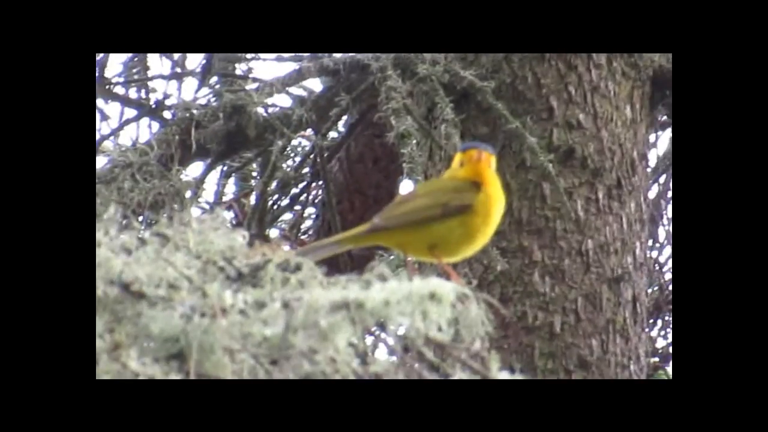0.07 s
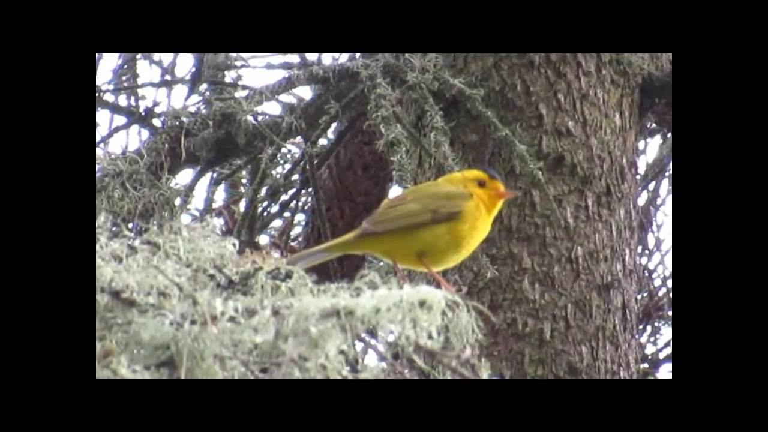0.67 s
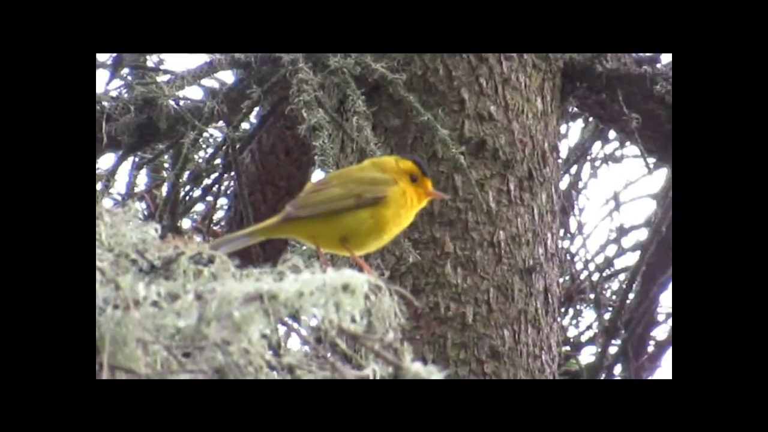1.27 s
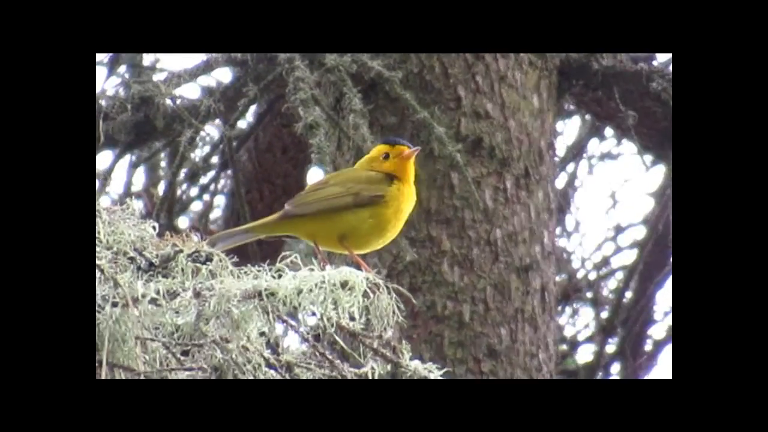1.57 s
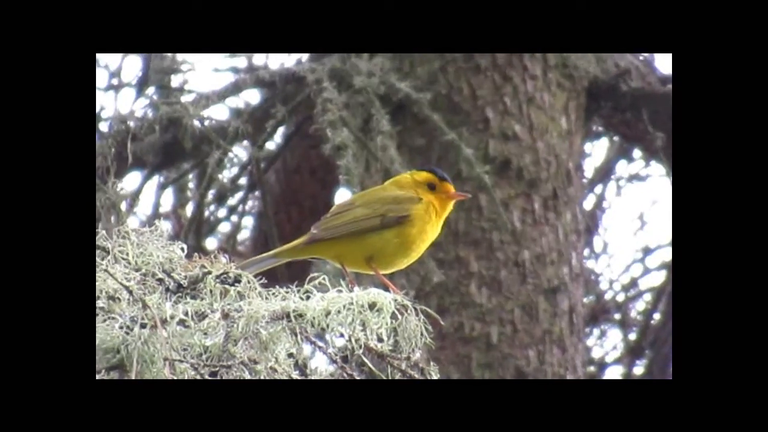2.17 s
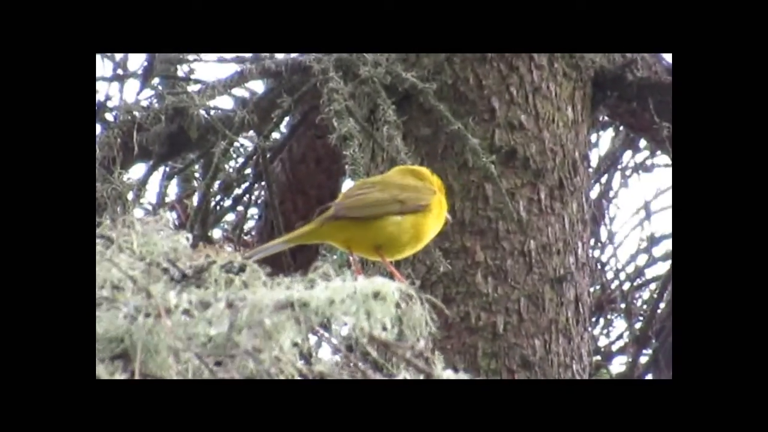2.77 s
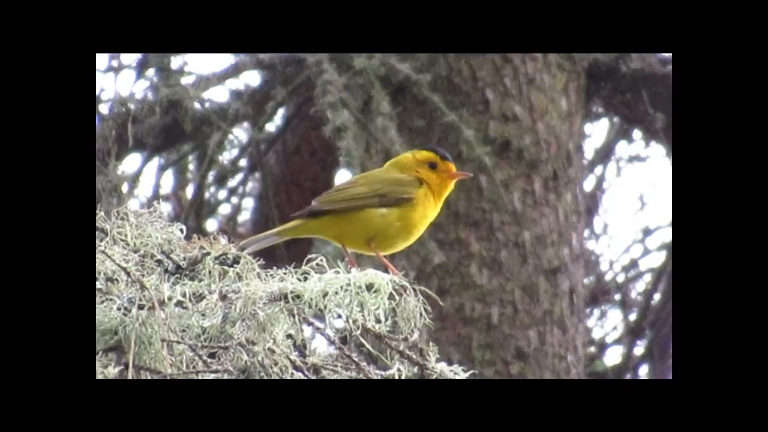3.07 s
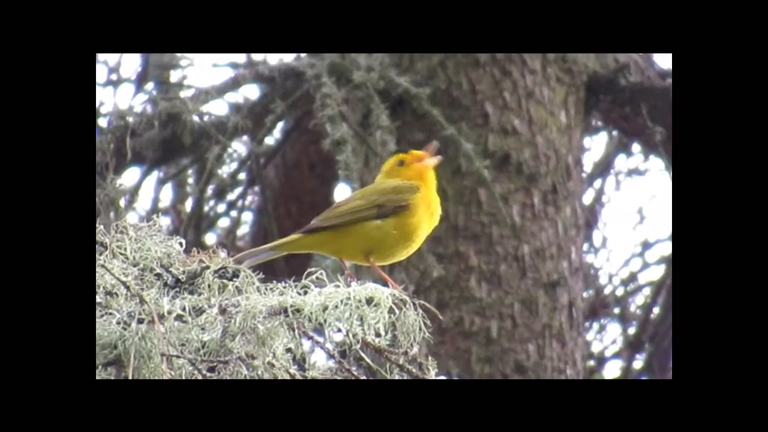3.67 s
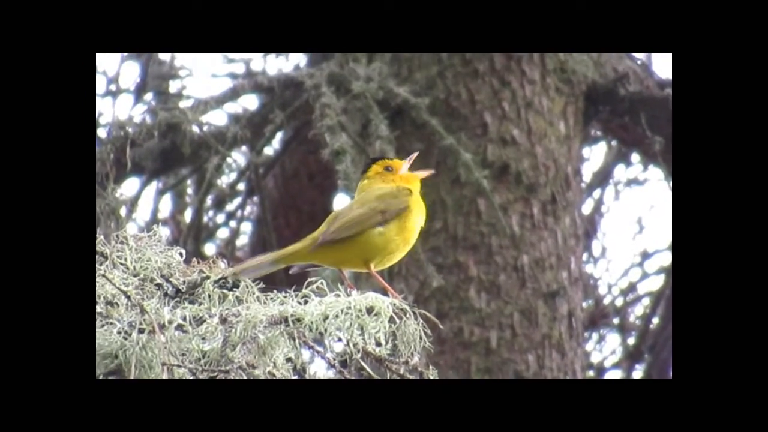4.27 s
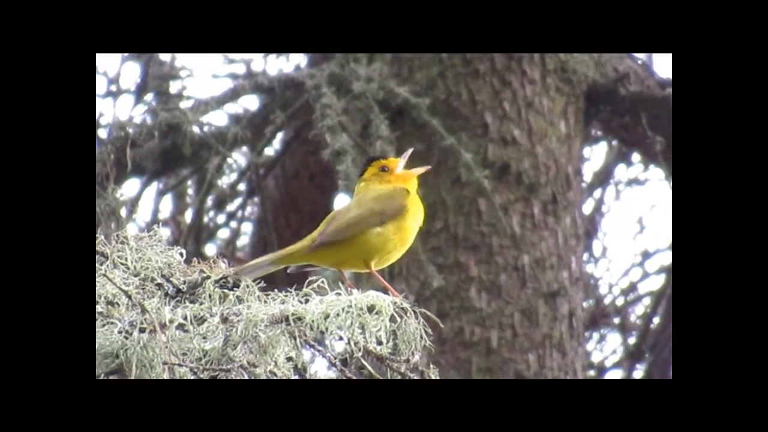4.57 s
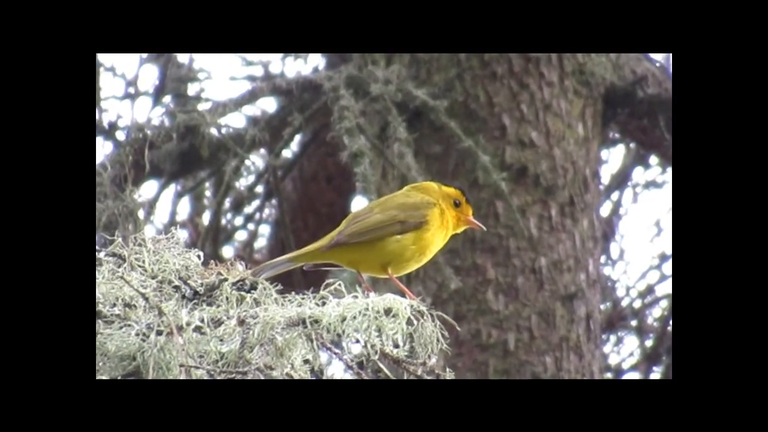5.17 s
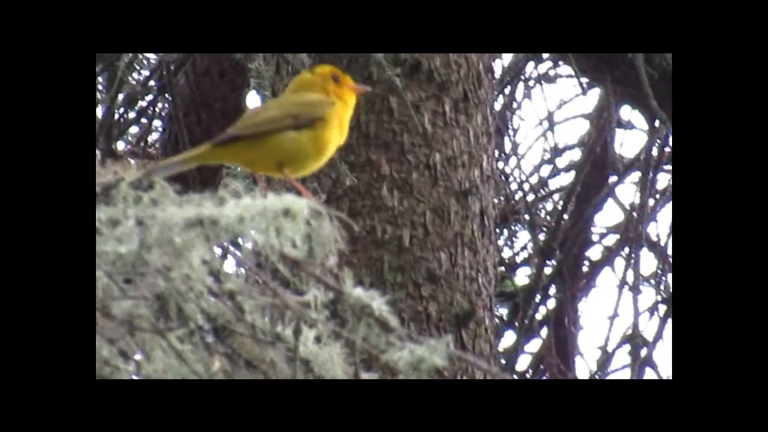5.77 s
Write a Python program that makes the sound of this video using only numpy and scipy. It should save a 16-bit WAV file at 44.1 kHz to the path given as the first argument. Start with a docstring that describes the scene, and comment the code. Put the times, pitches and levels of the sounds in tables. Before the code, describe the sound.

A faint, steady rush of distant traffic runs throughout, with a light hiss and a low engine hum that slowly rises in pitch and drops back at about 4.4 seconds. A few very quiet bird pings and peeps come in the first two and a half seconds. From about 3 seconds, thin, high, falling calls echo from deep in the wood. At 3.7 seconds a small warbler nearby starts a quick, even run of nine sharp, high two-part chips. They begin softly, swell to become by far the loudest sound, and end at about 5 seconds, leaving a short echo among the trees. A tiny tick is almost hidden in the song at 4.6 seconds. More distant calls follow, and a small dry tick sounds close by just before everything cuts off at 5.5 seconds.

```python
"""A steady rush of traffic is heard first, with a distant engine that slowly speeds up and drops back.
Birds call from deep in the wood, mostly as echo. Then a small yellow warbler on a conifer branch
sings a swelling run of sharp two-part chips, each a frequency-modulated whistle that trunks and
twigs scatter. Two small ticks sound close by, then the sound cuts to silence."""
import sys
import numpy as np
from scipy import signal
from scipy.fft import rfft, irfft, next_fast_len
from scipy.io import wavfile
from scipy.ndimage import uniform_filter1d, map_coordinates

SR = 44100
rng = np.random.default_rng(int(sys.argv[2]) if len(sys.argv) > 2 else 0)


def inscribe(sig):
    """Save sig as 16-bit PCM at rate SR to the path in sys.argv[1].

    A 1-D sig is mono; a 2-D sig holds one channel per row.
    Samples are clipped to [-1, 1] before scaling.
    """
    pcm = np.round(np.clip(np.atleast_2d(sig).T, -1, 1) * 32767)
    wavfile.write(sys.argv[1], SR, pcm.astype(np.int16))


N = 260631
T = np.arange(N) / SR


def amp(db):
    """Amplitude ratio of a level in decibels."""
    return 10 ** (np.asarray(db) / 20)


def wobble(rate):
    """Smooth random modulation: a spline through `rate` Gaussian values a second."""
    return map_coordinates(rng.standard_normal(int(N * rate / SR) + 4), [T * rate])


def filtered(x, response):
    """Linear filtering: the spectrum of x times a frequency response."""
    size = next_fast_len(N + SR // 2)
    return irfft(rfft(x, size) * response(np.fft.rfftfreq(size, 1 / SR)), size)[:N]


def noise(spectrum):
    """Spectral shaping: white noise coloured by (f/Hz, level/dB) rows and scaled to rms 1."""
    f, db = np.transpose(spectrum)
    x = filtered(rng.standard_normal(N), lambda hz: amp(np.interp(np.log(hz + 1), np.log(f), db)))
    return x / np.sqrt(np.mean(x ** 2) + 1e-20)


def phase_of(hz):
    """Phase as the time integral of frequency."""
    return 2 * np.pi * np.cumsum(hz) / SR


def add(track, start_s, sound):
    """Superposition: a sound joins the track at start_s."""
    part = track[round(start_s * SR):][:len(sound)]
    part += sound[:len(part)]


def scatter(x, t60, build_s):
    """Multiple scattering: echoes from many branches build up, then decay exponentially."""
    t = np.arange(SR) / SR
    tail = rng.standard_normal(SR) * amp(-60 * t / t60) * (1 - np.exp(-t / build_s))
    return signal.fftconvolve(x, tail / np.linalg.norm(tail))


# Spectrum of the hiss: f/Hz, relative level/dB
HISS_SPECTRUM = [(1000, 5.5), (4000, -3.5), (7000, 0.5), (10000, -1), (12500, -5), (15000, -12)]

def hiss():
    """Stationary broadband noise, faint and even."""
    return amp(-66) * noise(HISS_SPECTRUM)


# Spectra of road rumble and tyre rush: f/Hz, relative level/dB
RUMBLE_SPECTRUM = [(12, -11.5), (30, -4), (55, 2), (90, 1), (180, 4.5), (280, -1.5), (450, -5.5),
                   (800, -16), (2000, -49.5)]
TYRE_SPECTRUM = [(150, -30.5), (400, -5.5), (600, 0), (780, 1.5), (1000, -1.5), (1300, -3), (2000, -8.5),
                 (2800, -14.5), (4000, -22), (6000, -25), (12000, -40.5)]
# Tyre rush as the traffic draws slowly nearer: t/s, level/dB
TYRE_APPROACH = [(0, -46.5), (.6, -48), (2, -46.5), (4.3, -45.5), (4.8, -43.5), (5.45, -43)]

def traffic():
    """Rolling noise: broadband rumble and rush; the tread sings in a narrow band as the rush grows."""
    tyre_db = np.interp(T, *np.transpose(TYRE_APPROACH))
    rumble = amp(-45 + .7 * wobble(8)) * noise(RUMBLE_SPECTRUM)
    tyres = amp(tyre_db + .17 * wobble(6)) * noise(TYRE_SPECTRUM)
    tread_db = -47 + 5.1 * (tyre_db - np.max(tyre_db))
    tread = noise([(400, -42.5), (640, -8.5), (750, -2.5), (880, -11.5),
                   (1300, -41), (3100, -19), (4000, -49)])
    return rumble + tyres + amp(tread_db) * tread


# Firing rate through a slow climb and a gear change: t/s, f/Hz
FIRING_RATE = [(0, 45.6), (.4, 46.3), (.8, 49.5), (1.9, 52.5), (3.02, 54.9), (4.01, 58.4), (4.36, 58.5),
               (4.52, 51.5), (4.84, 50.6), (5.45, 51)]
# Engine harmonics: multiple of the firing rate, relative level/dB
ENGINE_ORDERS = [(1, 3), (2, 1), (3, -0.5), (4, 0.5), (5, -8.5), (6, -8)]
# Response of exhaust and path, a boom with a notch above it: f/Hz, level/dB
EXHAUST_RESPONSE = [(50, -62), (92, -63), (101, -56), (110, -53.5), (117, -49), (138, -44.3), (151, -45.7),
                    (171, -49.5), (177, -63), (200, -57), (230, -51.5), (280, -49.5), (350, -56)]

def engine(waver_db=1.3):
    """Source and filter: firing harmonics swell and fade as they cross the exhaust's resonance."""
    firing_hz = np.interp(T, *np.transpose(FIRING_RATE))
    phase = phase_of(firing_hz * (1 + .0031 * wobble(12)))
    f, response_db = np.transpose(EXHAUST_RESPONSE)
    out = np.zeros(N)
    for order, db in ENGINE_ORDERS:
        exhaust_db = np.interp(np.log(order * firing_hz), np.log(f), response_db)
        rms = amp(db + exhaust_db + waver_db * wobble(6.3))
        out += rms * np.sin(order * phase + .16 * wobble(14) + rng.uniform(0, 2 * np.pi))
    return np.sqrt(2) * out


def whistle(hz, waver=.014):
    """Frequency modulation: a soft-edged tone wavers at random about a pitch curve."""
    return signal.windows.tukey(len(hz), .5) * np.sin(phase_of(hz * (1 + waver * wobble(500)[:len(hz)])))


def slur(length_s, start_hz, end_hz):
    """Quadratic frequency sweep: a note glides and settles on its last pitch."""
    progress = np.linspace(0, 1, round(length_s * SR))
    return whistle(end_hz + (start_hz - end_hz) * (1 - progress) ** 2)


# Evenly timed corners of a zigzag chirp: f/Hz
CHIRP_CORNERS = [4400, 3750, 4700, 3860]

def quiet_birds(note_s=.025, chirp_s=.061, peep_hz=5300, peep_every_s=.08):
    """Direct sound outweighs reverberation in these drier calls: a ping, a chirp, then four peeps."""
    calls = np.zeros(N)
    add(calls, .11, amp(-49.2) * slur(note_s, start_hz=3840, end_hz=3730))
    position = np.linspace(0, len(CHIRP_CORNERS) - 1, round(chirp_s * SR))
    chirp_hz = np.interp(position, np.arange(len(CHIRP_CORNERS)), CHIRP_CORNERS)
    add(calls, 1.685, amp(-55.5) * whistle(chirp_hz, waver=.025))
    peep_pitches = peep_hz * (1 + .025 * rng.standard_normal((4, 2)))
    for k, (start_hz, end_hz) in enumerate(peep_pitches):
        add(calls, 2.272 + k * peep_every_s, amp(-63) * slur(note_s, start_hz, end_hz))
    return calls + amp(-2) * scatter(calls, t60=.7, build_s=.006)[:N]


# Slurred calls from deep in the wood: t/s, start f/Hz, end f/Hz, echo level/dB
FAR_CALLS = [ (1.469, 5000, 4560, -59), (2.928, 7300, 6620, -53), (3.07, 5900, 5200, -52.5),
             (3.155, 8150, 7600, -51.5), (3.236, 7660, 6170, -41.5), (3.265, 6230, 5000, -49),
             (3.396, 4900, 4200, -52.5), (3.51, 5900, 4380, -47.5), (3.645, 8380, 7740, -45),
             (3.777, 7400, 5520, -39.5), (3.859, 4300, 3960, -52.5), (4.36, 8300, 7850, -52),
             (5.09, 3010, 3350, -54.5), (5.202, 8100, 7130, -41), (5.344, 8300, 8040, -44),
             (5.374, 8000, 6500, -43)]

def far_birds(note_s=.032, direct_to_echo_db=-9):
    """Beyond the critical distance reverberation dominates: these calls arrive mostly as echo."""
    out = np.zeros(N)
    for start_s, start_hz, end_hz, db in FAR_CALLS:
        note = amp(db) * slur(note_s, start_hz, end_hz)
        add(out, start_s, amp(direct_to_echo_db) * note)
        add(out, start_s, scatter(note, t60=.94, build_s=.0077))
    return out


# Tiny dry knocks close by: t/s, ring f/Hz, ring T60/s, relative ring level/dB, crack level/dB
KNOCKS = [(4.587, 12500, 0.0018, -36, -54), (5.427, 1784, 0.006, -16.5, -31)]

def ticks(attack_s=.00017, crack_t60=.0026):
    """Impulse excitation: each knock gives a crack of noise and one damped mode."""
    out, t = np.zeros(N), T[:SR // 20]
    for start_s, hz, t60, ring_db, crack_db in KNOCKS:
        ring = amp(ring_db - 60 * t / t60) * np.sin(2 * np.pi * hz * t) * (1 - np.exp(-t / attack_s))
        crack = amp(crack_db - 60 * t / crack_t60) * np.diff(rng.standard_normal(len(t) + 1))
        add(out, start_s, 1.25 * ring + crack)
    return out


# Envelope of each fall in pitch: fraction of the fall, relative level/dB
FIRST_ENVELOPE = [(0, -16.5), (0.071, -25.5), (.15, -8.5), (.3, -3.5), (.58, -1), (.8, -1.5)]
SECOND_ENVELOPE = [(.1, -3.7), (.27, .9), (.55, -2.2), (.78, -7), (1, -17.5)]
# The beak's colouring of the octave: f/Hz, level/dB relative to the fundamental
BEAK_RESPONSE = [(8000, -44), (10000, -33), (12000, -44.5), (14000, -35)]

def chip(first_db, second_db, fall_s, turn_s, dip_hz, crest_hz, full_voice_db=-20.5):
    """Membrane oscillation: a whistle with a faint, raspy octave falls, turns upward and falls again."""
    push_db = first_db - full_voice_db  # a harder push widens and lengthens the chip
    top_hz = 8890 + 69.1 * push_db
    end_hz = 3550 - 61.5 * push_db
    second_fall_s = .035 + .00058 * push_db
    rest_s, rise_s = .4 * turn_s, .6 * turn_s
    corners = np.cumsum([0, fall_s, rest_s, rise_s, second_fall_s])
    _, dip_at, rise_at, crest_at, end_at = corners
    t = T[T < end_at]
    n = len(t)

    hz = np.exp(np.interp(t, corners, np.log([top_hz, dip_hz, dip_hz, crest_hz, end_hz])))
    hz = uniform_filter1d(hz, size=110) * (1 + .005 * wobble(400)[:n])
    hz *= 1 + .12 * np.exp(-t / .0014)  # the membrane starts overtight and lets go at once
    phase = phase_of(hz)

    # the voice nearly breaks in a deep dip and carries through a shallow one
    turn_db = first_db - 15.5 + .0183 * (dip_hz - 4920)
    contour = [(share * fall_s, first_db + db) for share, db in FIRST_ENVELOPE]
    contour += [(dip_at, (first_db + turn_db) / 2 - 1), (rise_at, turn_db)]
    contour += [(rise_at + .78 * rise_s, turn_db - 3)]
    contour += [(crest_at + share * second_fall_s, second_db + db) for share, db in SECOND_ENVELOPE]
    flutter_db = .7 * wobble(300)[:n]
    envelope = amp(np.interp(t, *np.transpose(contour)) + flutter_db) * signal.windows.tukey(n, .03)

    rasp_db = 2 * wobble(500)[:n]
    octave_gain = amp(np.interp(2 * hz, *np.transpose(BEAK_RESPONSE)) + rasp_db)
    octave = octave_gain * np.sin(2 * phase + .5 * wobble(1500)[:n])
    turbulence = amp(-46.2) * np.diff(rng.standard_normal(n + 2), n=2)
    return envelope * (np.sin(phase) + octave + turbulence)


# The run of chips: t/s, first fall level/dB, second fall level/dB,
# first fall duration/s, turn duration/s, dip f/Hz, crest f/Hz
SONG = [ (3.692, -44.5, -43, 0.022, 0.0093, 5220, 6900), (3.846, -35.5, -30, .033, .008, 5150, 6450),
        (4.008, -28.5, -25.5, 0.026, 0.013, 5300, 7200), (4.164, -26, -24, .028, .012, 5250, 7160),
        (4.316, -24.5, -23.5, .032, 0.011, 4965, 7400), (4.466, -23, -23.5, 0.032, 0.015, 5050, 7230),
        (4.615, -22.5, -23.3, .030, .0145, 5120, 7440), (4.764, -22, -24, 0.028, 0.017, 5210, 7360),
        (4.918, -22.5, -23.5, 0.023, 0.016, 5730, 6600)]

def warbler():
    """Direct sound plus scattering: the near bird's own tree answers quickly, the wood slowly."""
    out = np.zeros(N)
    for start_s, *shape in SONG:
        call = chip(*shape)
        add(out, start_s, call)
        add(out, start_s, amp(-10.5) * scatter(call, t60=.14, build_s=.004))
        add(out, start_s, amp(-13) * scatter(call, t60=1.0, build_s=.015))
    return out


def scene():
    """Superposition of birds, distant road, ticks and hiss in one channel."""
    return (warbler() + far_birds() + quiet_birds() + engine() + traffic() + ticks() + hiss())[None]


def record(dry, end_s=5.4893, cutoff_hz=15150):
    """Gating and band limiting: the sound stops dead, and a steep low-pass removes the top treble."""
    gated = dry[0] * (T < end_s)
    return filtered(gated, lambda hz: 1 / np.sqrt(1 + (hz / cutoff_hz) ** 400))[None]


dry = scene()
out = record(dry)
inscribe(out)
```